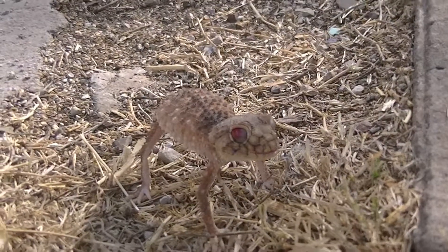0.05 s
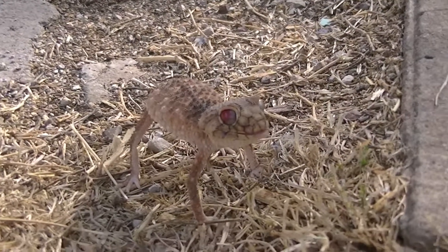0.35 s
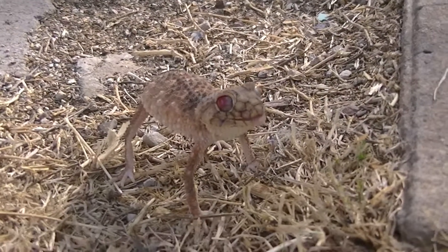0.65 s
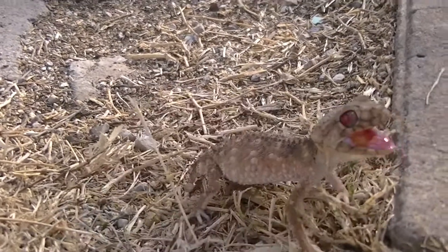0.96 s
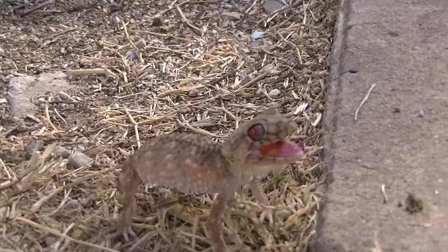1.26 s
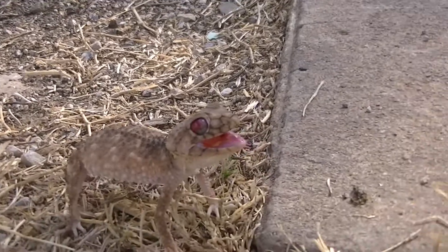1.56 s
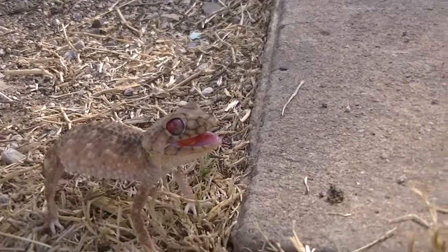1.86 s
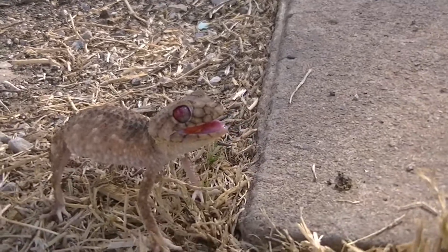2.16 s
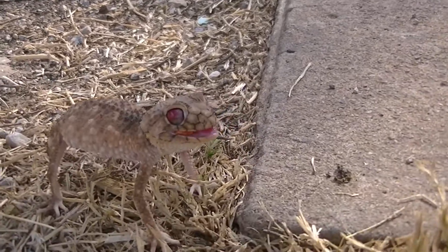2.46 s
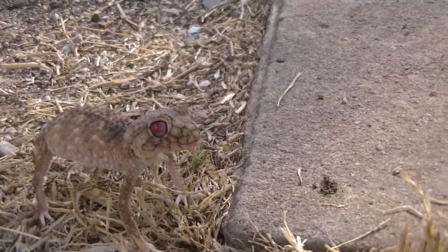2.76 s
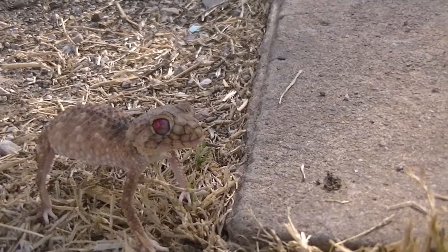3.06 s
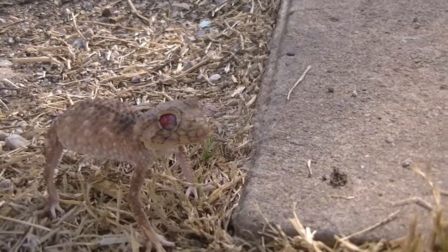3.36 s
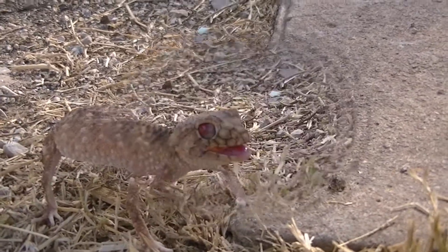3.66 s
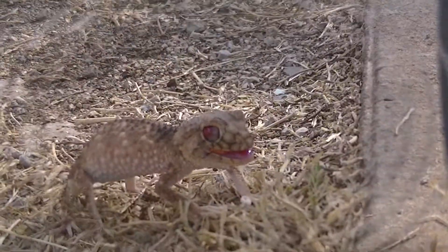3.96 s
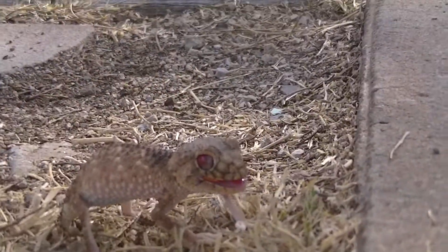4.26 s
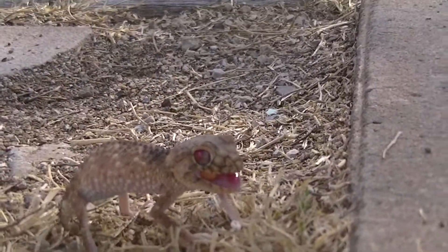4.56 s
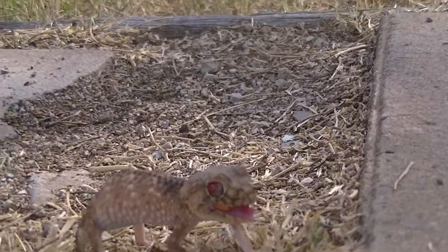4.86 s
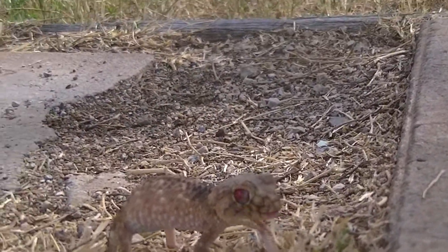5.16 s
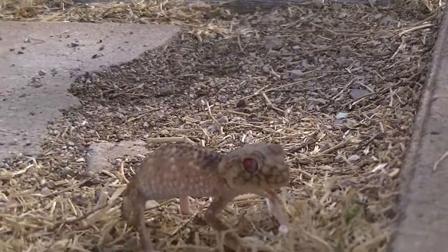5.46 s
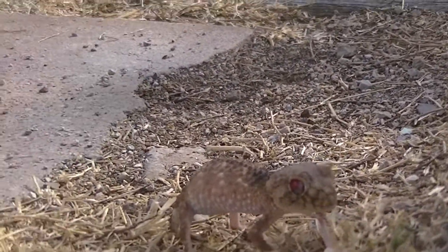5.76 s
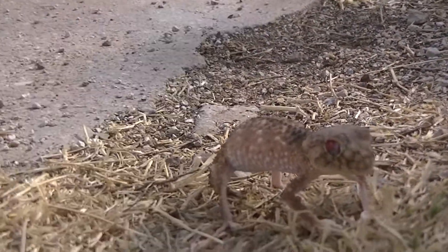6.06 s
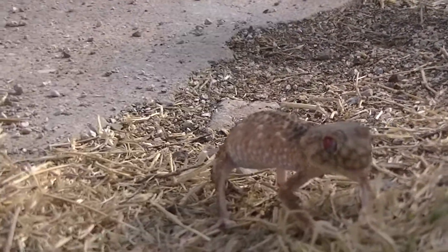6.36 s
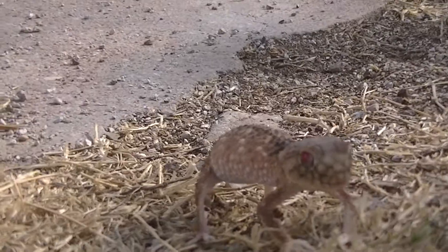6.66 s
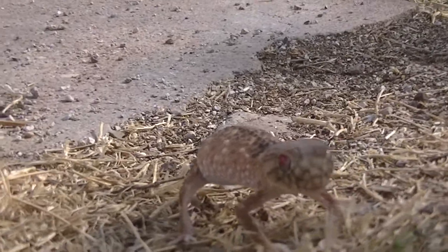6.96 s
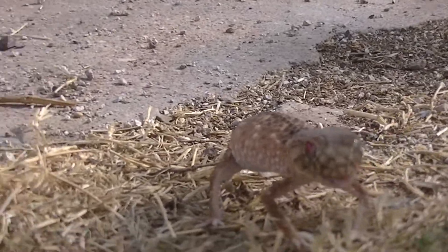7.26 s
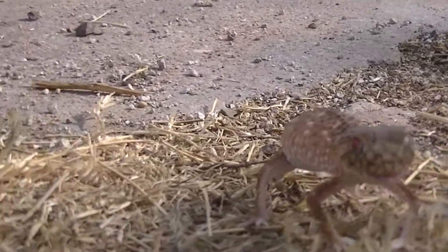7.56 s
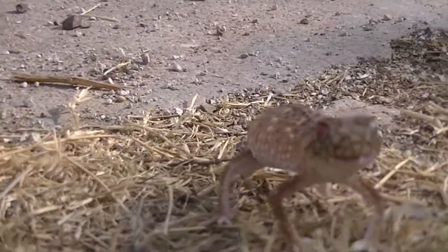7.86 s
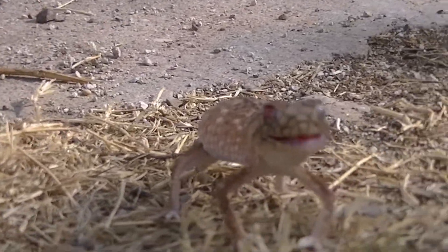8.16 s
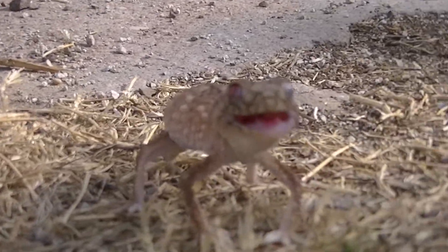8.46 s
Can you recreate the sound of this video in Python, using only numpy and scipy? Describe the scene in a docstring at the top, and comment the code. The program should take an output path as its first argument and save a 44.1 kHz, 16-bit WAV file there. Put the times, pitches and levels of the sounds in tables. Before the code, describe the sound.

Close, shrill lizard squeals, the first breaking into a bark, among straw crackles and a sharp snap, over distant birds and low rumble.

```python
"""A low outdoor rumble and faint bird whistles come first; then a gecko squeals near the microphone.
On dry straw and gravel it threatens three times, whistling through a tight glottis; the first squeal
breaks into a raspy bark of slack folds as it lunges. Close by, straw rustles and ticks, the ground
takes a few dull knocks and something hard snaps with one sharp click.
Small birds twitter farther off, echoing across the yard."""
import sys
import numpy as np
from scipy import signal
from scipy.fft import rfft, irfft
from scipy.io import wavfile
from scipy.ndimage import uniform_filter1d

SR = 44100
rng = np.random.default_rng(int(sys.argv[2]) if len(sys.argv) > 2 else 0)


def inscribe(sig):
    """Save sig as 16-bit PCM at rate SR to the path in sys.argv[1].

    A 1-D sig is mono; a 2-D sig holds one channel per row.
    Samples are clipped to [-1, 1] before scaling.
    """
    pcm = np.round(np.clip(np.atleast_2d(sig).T, -1, 1) * 32767)
    wavfile.write(sys.argv[1], SR, pcm.astype(np.int16))


N = 379260
TIME = np.arange(N) / SR
TOP_HZ = 15900

# The three squeals: (time [s], pitch [Hz], relative level [dB], roughness [0-1])
FIRST_SQUEAL = [(.653, 1150, -38.5, .7), (.69, 1614, -30.5, .35), (.728, 1545, -29.5, 0.27),
                (.75, 1754, -24.5, 0.22), (.778, 1755, -25.2, 0.29), (.8, 1970, -29, 0.43),
                (.85, 2100, -37, 1), (.9, 1698, -28, .15), (.945, 1640, -31, 0.05),
                (1.015, 1600, -32.5, .25), (1.06, 1320, -41.5, .3), (1.15, 965, -48, .3),
                (1.24, 790, -56, .4)]
SECOND_SQUEAL = [(4.16, 1303, -52, 0.94), (4.205, 972, -41, 0.87), (4.262, 1535, -39.5, .9),
                 (4.392, 1510, -40.5, 0.87), (4.48, 1029, -47, 0.89), (4.565, 998, -61, .9),
                 (4.635, 1240, -48.5, .9), (4.7, 1026, -54, 1)]
THIRD_SQUEAL = [(7.86, 1600, -44, 1), (7.896, 2217, -32, .7), (7.94, 2245, -35, 0.53),
                (8.08, 2215, -34.5, 0.8), (8.106, 2090, -33, 1), (8.128, 1745, -31.5, .55),
                (8.218, 1775, -34, .55), (8.248, 1516, -41.5, 0.78), (8.33, 1380, -48.5, 1)]
# The mouth's colour in each: (frequency [Hz], gain [dB])
WIDE_MOUTH = [(800, 0), (1750, -16), (2400, -2.5), (3400, -0.5), (4200, -4.5), (5200, -3), (6800, -18.5),
              (8700, -21.5), (12000, -30), (15000, -45)]
NARROW_MOUTH = [(900, 0.5), (1550, -6.5), (2100, 8), (3100, 1.5), (4600, -6), (6500, -13), (7400, -22),
                (8900, -13.5), (10000, -29), (15000, -41)]
PARTED_MOUTH = [(1200, -7), (1780, 1), (2250, -1), (3500, 8), (4500, -1), (5400, 2.5), (6800, -12),
                (9000, -6.5), (11000, -18.5), (15000, -42)]
def gecko():
    """The gecko, near the microphone: three thin squeals, a bark and a moan."""
    first, second, third, low = np.zeros((4, N))
    add(first, *squeal(FIRST_SQUEAL, WIDE_MOUTH, octave_db=4.5, flutter_hz=379.4, flutter=.11,
                       jitter=.068, shimmer_db=1.5, hiss_db=-15, tire=.55))
    add(second, *squeal(SECOND_SQUEAL, NARROW_MOUTH, octave_db=2.5, flutter_hz=220, flutter=.043,
                        jitter=.0428, shimmer_db=2, hiss_db=-16))
    add(third, *squeal(THIRD_SQUEAL, PARTED_MOUTH, octave_db=4, flutter_hz=285, flutter=.057,
                       jitter=.028, shimmer_db=2, hiss_db=-12))
    add(low, *bark())
    add(low, *moan())
    return gain(-1) * first + gain(2.5) * second + gain(-1) * third + low


def squeal(rows, mouth, octave_db, flutter_hz, flutter, jitter, shimmer_db, hiss_db, tire=0):
    """A tight glottis whistles harmonics; a slower flutter of the folds splits them into sidebands."""
    t, hz, level_db, rough = contours(rows)
    rough = np.clip(rough, 0, 1)
    beat = np.sin(2 * np.pi * cycles(flutter_hz * (1 + .1936 * wander(t, 58))))
    drift = .00267 * wander(t, 37) + rough ** 2 * jitter * wander(t, 375)
    turns = cycles(hz * (1 + drift + rough * flutter * beat))
    # as the breath gives out, the second partial takes over from the higher ones
    lift_db = octave_db + tire * np.maximum(-38 - level_db, 0)
    tone = 0
    for k in range(1, 12):
        partial_db = spectrum_at(mouth, k * hz) + lift_db * (k == 2) + min(k, 3) * wander(t, 49)
        # the fundamental stays pure while the overtones break up
        breakup = np.minimum(.35 * (k - 1) * rough, 1.2)
        scatter = breakup * (wander(t, 300) + 1j * wander(t, 300)) / np.sqrt(2)
        partial = ((1 + scatter) * np.exp(2j * np.pi * k * turns)).real
        tone += gain(partial_db) * (k * hz < TOP_HZ) * partial
    hiss = unit_rms(band(coloured(rng.standard_normal(len(t)), mouth), 400, 16000))
    voice = tone / np.sqrt(uniform_filter1d(tone ** 2, 512) + 1e-9) + gain(hiss_db) * rough * hiss
    # the folds are loudest at the slack part of each flutter, which favours the lower sidebands
    throb = 1 - .43 * rough * beat
    shimmer = gain(np.clip(shimmer_db * wander(t, 62), -5, 3))
    return t[0], unit_rms(voice * throb * shimmer) * gain(level_db) * signal.windows.tukey(len(t), .05)


# The bark: (time [s], pulse rate [Hz], level [dB], roughness [capped at 1])
BARK = [(.788, 152.7, -53, 1), (.795, 155.3, -26.5, 0.53), (.81, 212.5, -26.5, 0.5),
        (.83, 260.3, -24.5, 0.42), (.85, 249.5, -26.5, 0.24), (.872, 243.2, -25.5, 0.25),
        (.89, 205.5, -28.5, 0.57), (.91, 160.5, -31.5, 0.67), (.935, 141, -35.5, 0.8), (.97, 132, -44, 1.1)]
# The throat's colour: (frequency [Hz], gain [dB])
THROAT = [(200, -32), (330, 10), (500, 3), (720, -7.5), (980, -4.5), (1250, 4), (1800, -5.5), (2500, -6),
          (3400, 0), (4700, -3), (5900, -24), (8500, -15), (10200, -10), (15500, -18.5)]
def bark(jitter=.042, puff_turns=.38):
    """The folds slacken and slap: slow pulses growl, and a puff of air on each one rasps above them."""
    t, hz, level_db, rough = contours(BARK)
    rough = np.clip(rough, 0, 1)
    turns = cycles(hz * (1 + jitter * rough * wander(t, 170)))
    slaps = unit_rms(np.sinc((turns - np.round(turns)) * SR / hz) * gain(3.8 * rough * wander(t, 200)))
    growl = (1.2 - rough) * band(slaps, 100, 3350, order=3)
    puffs = unit_rms((.28 + np.exp(-(turns % 1) / puff_turns)) * rng.standard_normal(len(t)))
    rasp = 1.7 * rough * band(puffs, 750, 16000)
    breath = .79 * band(puffs, 2600, 16000, order=4)
    voice = coloured(growl + rasp + breath, THROAT)
    return t[0], voice / np.sqrt(uniform_filter1d(voice ** 2, 800)) * gain(level_db)


# A faint moan leading into the second squeal: (time [s], pitch [Hz], level [dB])
MOAN = [(4.04, 315, -49), (4.09, 361, -50.5), (4.14, 420, -47), (4.18, 390, -49), (4.215, 307, -58)]
def moan(overtone_db=-10):
    """A soft low arch of tone with one overtone."""
    t, hz, level_db = contours(MOAN)
    angle = 2 * np.pi * cycles(hz * (1 + .016 * wander(t, 60)))
    return t[0], gain(level_db) * unit_rms(np.sin(angle) + gain(overtone_db) * np.sin(2 * angle))


# The small hard thing's modes: (frequency [Hz], relative level [dB], t60 [s])
CLICK_MODES = [(824, -15, 0.03), (975, -15.5, 0.033), (1530, -13, .025), (1830, -7, 0.046),
               (1990, -9.5, 0.051), (2460, -5, 0.021), (2770, 0, 0.02), (3520, -6, 0.031),
               (4170, -8.5, 0.02), (4600, -14, 0.028), (5530, -3.5, 0.014), (6800, -15, .011),
               (9760, -7, 0.0065), (11450, -11, .009)]
def click(at_s=6.2303, peak_db=-6, crack_db=-9, crack_t60=.022):
    """Something small and hard snaps near the microphone and rings very briefly."""
    out, t = np.zeros(N), np.arange(4096) / SR
    ring = sum((-1) ** k * gain(db - 60 * t / t60) * np.sin(2 * np.pi * hz * t)
               for k, (hz, db, t60) in enumerate(CLICK_MODES))
    crack = band(rng.standard_normal(len(t)), 960, 5300, order=1) * gain(-60 * t / crack_t60)
    snap = band(unit_rms(ring) + gain(crack_db) * unit_rms(crack), 250, 11500)
    add(out, at_s, peaking(snap, peak_db))
    return out


# The loudest stalks: (time [s], peak [dB], ring [Hz], relative crack level [dB], t60 [s])
STALK_SNAPS = [(2.0438, -35, 2080, -9, .03), (2.066, -34.5, 2600, -17, .04),
               (2.7168, -30.5, 1830, -24, 0.053), (3.8264, -38, 1020, -11, .028),
               (3.8969, -30.5, 2150, -12, 0.015), (3.956, -30.5, 9820, -11, .024),
               (4.0048, -35, 4990, -10, .03), (4.1597, -26.5, 2310, -2, .041),
               (4.4253, -29, 2890, -19, .034), (4.6353, -26.5, 2430, -14.5, 0.067),
               (4.7162, -36, 2390, -9.5, 0.079), (4.935, -29.5, 2200, -19, 0.15),
               (5.1103, -37, 2120, -11, .043), (5.5608, -22, 2460, -7.5, 0.018),
               (5.6141, -34, 3100, -13, 0.024), (5.9757, -33, 1640, -17, .06), (5.9959, -24, 3450, -4, .04),
               (6.124, -32.5, 1550, -4.5, .035)]
def ticks(width=1.67, treble_db=2):
    """Stalks snap close by, each with a short ring around its own pitch and a quicker treble crack."""
    out, t = np.zeros(N), np.arange(4096) / SR
    for s, db, hz, crack_db, t60 in STALK_SNAPS + small_ticks():
        noise = rng.standard_normal(len(t))
        fall = gain(-60 * t / t60)
        ring = unit_rms(band(noise, hz / width, hz * width, order=4) * fall)
        crack = unit_rms(band(noise, 2300, 10500) * fall ** 2.2)
        add(out, s, peaking(ring + gain(crack_db + treble_db) * crack, db))
    return out


def small_ticks(per_s=11, ring_hz=2200, octaves=.42, crack_db=-15, t60=.033):
    """Rows for stalks that snap by chance, louder the harder the straw is stirred."""
    stir = stirring()
    at = np.flatnonzero((rng.random(N) < per_s / SR) & (stir > gain(-70)))
    peaks_db = 20 * np.log10(stir[at]) + 16
    return [(i / SR, db + 1.5 * size, ring_hz * 2 ** (octaves * pitch), crack_db, t60)
            for i, db, (size, pitch) in zip(at, peaks_db, rng.standard_normal((len(at), 2)))]


# Bouts of stirring in the straw: (time [s], length [s], relative treble level [dB])
STIRS = [(0.854, 0.034, -53), (1.005, .01, -59), (2.055, .012, -57.5), (2.135, .03, -66),
         (3.79, .415, -60.5), (4.223, 0.52, -68.5), (4.955, .018, -61.5), (6.879, .1, -66),
         (7.285, .1, -55.3), (7.495, 0.055, -64.5)]
def stirring(attack_s=.04, release_s=.033):
    """How hard the straw is stirred: each bout rises quickly, holds and dies away."""
    stir = np.zeros(N)
    for s, length, db in STIRS:
        rise = np.clip((TIME - s) / attack_s + 1, 0, 1)
        fall = np.exp(-np.maximum(TIME - s - length, 0) / release_s)
        stir += gain(db) * rise * fall
    return stir


# Dry straw's colour: (frequency [Hz], gain [dB])
STRAW = [(410, -13.5), (700, 4.5), (1150, -3.5), (1950, -3.5), (2310, 3.5), (2660, -1), (4950, -2.5),
         (5640, -5), (10900, -2), (15500, -14)]
def rustle(slips_per_s=1300, spread_db=4, scrape=.66):
    """Dry stalks near the microphone slide and crackle in a swarm of tiny slips."""
    sizes = gain(spread_db * np.minimum(rng.exponential(1, N), 4)) * rng.choice([-1, 1], N)
    slips = unit_rms(sizes * (rng.random(N) < slips_per_s / SR)) + scrape * rng.standard_normal(N)
    straw = coloured(slips * gain(1.9 * wander(TIME, 52)), STRAW)
    straw /= np.std(band(straw, 10500, 15500, order=4))
    return gain(3.5) * stirring() * straw


# Single knocks: (time [s], peak [dB], brightness [Hz])
KNOCKS = [(4.632, -35, 1390), (5.111, -37, 269), (5.506, -33.5, 1270), (5.686, -36, 331),
          (5.996, -35, 1260), (6.125, -35, 466), (7.667, -29, 260), (8.398, -37, 202), (8.519, -42, 393),
          (8.547, -39.5, 578)]
# Quick runs of knocks: (time [s], length [s], mid-run peak [dB], brightness [Hz])
SCUFFLES = [(7.334, 0.041, -24, 347), (8.047, .068, -24.5, 540)]
def knocks(knock_t60=.044, scuffle_t60=.06, step_s=.0145, edge_db=-4.5):
    """Dull blows on the ground close by, singly or in scuffles that swell and ebb."""
    out = np.zeros(N)
    for s, db, bright_hz in KNOCKS:
        add(out, s, peaking(blow(bright_hz, knock_t60), db))
    for s, length, db, bright_hz in SCUFFLES:
        for after in np.arange(0, length, step_s):
            ebb_db = edge_db * abs(2 * after / length - 1)
            add(out, s + after, peaking(blow(bright_hz, scuffle_t60), db + ebb_db))
    return out


# The ground's modes: (frequency [Hz], relative level [dB], ring time [factor])
GROUND_MODES = [(206, -10.5, 1), (390, -7, 0.66), (531, -2, 0.86), (752, -4.5, 0.29), (1014, -5, 0.92),
                (1270, 1.5, 1), (1650, -22, 0.89)]
def blow(bright_hz, t60, detune=.064, grit=.46):
    """A soft blow on littered ground: a few damped low modes and some grit."""
    t = np.arange(6000) / SR
    fall_db = -60 * t / t60
    ring = 0
    for hz, db, hold in GROUND_MODES:
        wave = rng.choice([-1, 1]) * np.sin(2 * np.pi * hz * (1 + detune * rng.standard_normal()) * t)
        ring += wave * gain(db + fall_db / hold) / (1 + (hz / (1.33 * bright_hz)) ** 3)
    litter = band(rng.standard_normal(len(t)), 246, 1270) * gain(fall_db)
    return band(unit_rms(ring) + grit * unit_rms(litter), 230, 5000)


# Twitters: (time [s], arch gap [s], lead-in [Hz], first top [Hz], second top [Hz], relative level [dB])
TWITTERS = [(1.86, .052, 4450, 4300, 4400, -45.5), (2.764, .047, 5460, 4290, 4320, -43.5),
            (4.342, .047, 4950, 4550, 4500, -40), (5.192, .07, 5100, 4500, 3850, -36.5),
            (6.026, .034, 3340, 3680, 3760, -40.5), (7.55, .039, 4980, 4200, 4250, -41.5),
            (8.33, .037, 3900, 4150, 3510, -45)]
# Slurred whistles: (time [s], length [s], start [Hz], end [Hz], relative level [dB])
SLURS = [(.231, .075, 5120, 4900, -52), (.277, .054, 4000, 3300, -55), (.37, 0.033, 4620, 4600, -52.5),
         (1.24, 0.071, 4710, 4450, -49), (1.429, 0.042, 4700, 6300, -51.5), (1.483, .056, 4600, 3000, -54),
         (2.152, .11, 5100, 4820, -51.5), (2.919, .08, 5150, 4860, -57), (3.729, 0.03, 4200, 6300, -52),
         (4.945, .075, 5310, 3390, -50.5), (5.03, .05, 3600, 5000, -52), (5.218, 0.021, 3650, 3900, -40.5),
         (5.728, .11, 5180, 2930, -54.5), (5.952, 0.044, 4100, 4900, -46),
         (6.674, 0.099, 5380, 3400, -48.5), (6.787, .053, 3440, 3350, -48), (6.85, 0.1, 5130, 4850, -54.5),
         (7.765, .06, 5240, 3320, -51.5)]
def birds():
    """Loud syllables come straight across the yard; faint ones reach the microphone mostly as echo."""
    direct, scattered = np.zeros((2, N))
    song = [note for row in TWITTERS for note in twitter(*row)]
    song += [(s, length, start, (start + end) / 2, end, db) for s, length, start, end, db in SLURS]
    for s, *shape, db in song:
        direct_share = np.interp(db, [-56, -40], [.25, .7])
        add(direct, s, gain(db) * np.sqrt(direct_share) * syllable(*shape))
        add(scattered, s, gain(db) * np.sqrt(1 - direct_share) * syllable(*shape, waver=.11))
    return gain(-1) * (direct + chipping_bird() + 1.05 * yard(scattered, t60=.38))


def twitter(s, gap_s, lead_hz, first_hz, second_hz, db, foot=.68, tail_hz=3050):
    """Syllable rows for a rising lead-in, two quick arches and a falling tail."""
    lead_s, first_s, second_s, tail_s = .046, .034, .019, .04
    return [(s - lead_s, lead_s, lead_hz / 1.09, lead_hz, lead_hz * 1.09, db - 8.5),
            (s, first_s, first_hz * foot, first_hz, first_hz * foot, db),
            (s + gap_s, second_s, second_hz * foot, second_hz, second_hz * foot, db - 2),
            (s + gap_s + second_s / 2, tail_s, tail_hz / .87, tail_hz, tail_hz * .87, db - 8)]


def syllable(length, first_hz, middle_hz, last_hz, waver=.018):
    """A bird's whistle bends through three pitches."""
    t = np.arange(0, length, 1 / SR)
    position = 2 * t / length - 1
    hz = middle_hz + (np.where(position < 0, first_hz, last_hz) - middle_hz) * abs(position) ** 1.378
    angle = 2 * np.pi * cycles(hz * (1 + waver * wander(t, 366)))
    return unit_rms(np.sin(angle) * signal.windows.tukey(len(t), .5))


def chipping_bird(start_s=2.322, end_s=3.52, period_s=.13, hz=3880, fade_db_per_s=5):
    """A second, softer bird chips at an even pace, fading as it goes."""
    out = np.zeros(N)
    for s in np.arange(start_s, end_s, period_s):
        add(out, s, gain(-57 - fade_db_per_s * (s - start_s)) * syllable(.02, .9 * hz, hz, .9 * hz))
    return out


def chatter(per_s=6, length_s=.045, centre_hz=3900, spread_octaves=.25, bend_octaves=.2):
    """Faint syllables of random pitch and bend from the farthest birds."""
    out = np.zeros(N)
    at = np.flatnonzero(rng.random(N) < per_s / SR)
    for i, (pitch, start, end, size) in zip(at, rng.standard_normal((len(at), 4))):
        pitches = centre_hz * 2 ** (spread_octaves * pitch + bend_octaves * np.array([start, 0, end]))
        add(out, i / SR, gain(-66.5 + 2 * size) * syllable(length_s, *pitches))
    return out + yard(out, t60=.38)


# The open air's colour: (frequency [Hz], gain [dB])
AIR = [(15, -57), (25, -53), (59, -8.5), (130, -1.5), (184, -3.5), (241, -1.5), (557, -17.5), (905, -20),
       (1390, -22), (1780, -23.5), (2590, -23), (3880, -27), (4210, -29), (4820, -27.5), (15800, -38)]
# The far rumble and the far hum: (time [s], level [dB])
RUMBLE = [(0.0, -54.5), (0.5, -52.5), (1.72, -51), (3.47, -47.5), (4.43, -53), (7.26, -56), (7.42, -53),
          (8.6, -55.5)]
HUM = [(0, -68), (4.2, -58), (5, -65.5), (7, -58.5), (8.6, -57.5)]
def outdoors(split_hz=480, hiss_db=-55.5, hum_hz=193.7):
    """A lumpy far rumble and a wavering hum, under air hiss that swells a little with the rumble."""
    noise = coloured(rng.standard_normal(N), AIR)
    rumble = signal.sosfilt(signal.butter(3, split_hz, fs=SR, output="sos"), noise)
    hiss = signal.sosfilt(signal.butter(3, split_hz, "high", fs=SR, output="sos"), noise)
    rumble /= np.std(band(noise, 80, 400, order=4))
    hiss /= np.std(band(noise, 700, 15000, order=4))
    hum = unit_rms(np.sin(2 * np.pi * cycles(hum_hz * (1 + .018 * wander(TIME, 14.7)))))
    rumble_db = np.interp(TIME, *np.transpose(RUMBLE)) - .04
    return (rumble * gain(rumble_db + .6 * wander(TIME, 10))
            + hiss * gain(hiss_db + .07 * (rumble_db - rumble_db.mean()))
            + hum * gain(np.interp(TIME, *np.transpose(HUM)) + 1.2 * wander(TIME, 12)))


def yard(x, t60, echoes_per_s=2000):
    """Sparse echoes from ground, walls and bushes, dull in the treble."""
    t = np.arange(SR) / SR
    taps = rng.choice([-1, 1], SR) * (rng.random(SR) < echoes_per_s / SR) * (t > .006)
    tail = band(taps * gain(-60 * t / t60), 320, 3800, order=1)
    return signal.oaconvolve(x, tail / np.linalg.norm(tail))[:N] / 2


def gain(db):
    """Decibels to a factor."""
    return 10 ** (np.asarray(db) / 20)


def unit_rms(x):
    """Scales to an rms of one."""
    return x / np.sqrt(np.mean(x ** 2) + 1e-20)


def peaking(x, db):
    """Scales to a peak of db."""
    return gain(db) * x / abs(x).max()


def cycles(hz):
    """The running phase of a pitch, in turns."""
    return np.cumsum(hz) / SR


def spectrum_at(points, hz):
    """A spectrum's value at hz, on a log-frequency axis."""
    points_hz, db = np.transpose(points)
    return np.interp(np.log(hz + 1), np.log(points_hz + 1), db)


def contours(rows):
    """The times a table spans, and its columns at every sample."""
    s, *columns = np.transpose(rows)
    t = np.arange(s[0], s[-1], 1 / SR)
    return [t] + [np.interp(t, s, column) for column in columns]


def add(mix, s, sound):
    """Mixes a sound in at s seconds."""
    part = mix[max(round(s * SR), 0):][:len(sound)]
    part += sound[:len(part)]


def coloured(x, points):
    """Filters x by a spectrum, causally, so that every pulse rings forwards."""
    log_gain = spectrum_at(points, abs(np.fft.fftfreq(2048, 1 / SR))) * np.log(10) / 20
    taps = np.fft.ifft(np.exp(np.conj(signal.hilbert(log_gain)))).real
    return signal.oaconvolve(x, taps)[:len(x)]


def band(x, low_hz, high_hz, order=2):
    """Band-pass filter."""
    return signal.sosfilt(signal.butter(order, [low_hz, high_hz], "band", fs=SR, output="sos"), x)


def wander(t, rate_hz):
    """Smooth random motion of rms one, up to about rate_hz."""
    hz = np.fft.rfftfreq(len(t), 1 / SR)
    noise = rng.standard_normal(N if len(t) > SR else SR)[:len(t)]
    return unit_rms(irfft(rfft(noise) / (1 + (hz / rate_hz) ** 4), len(t)))


def scene(wall_delay_s=.14, wall_db=-19):
    """One microphone in a yard: near sounds are almost dry, but a far wall returns the gecko's voice."""
    voice, snap = gecko(), click()
    near = voice + ticks() + knocks() + rustle()
    echo = gain(-15) * yard(near, t60=.3)
    add(echo, wall_delay_s, gain(wall_db) * band(voice, 1800, 6000))
    snap_echo = gain(-24.5) * yard(band(snap, 700, 4000), t60=.98)
    return (near + snap + birds() + echo + snap_echo + outdoors() + chatter())[None]


def record(dry):
    """The recorder cuts the treble above TOP_HZ."""
    lowpass = signal.firwin(511, TOP_HZ, window=("kaiser", 9), fs=SR)
    return signal.oaconvolve(dry, lowpass[None], "same")


dry = scene()
out = record(dry)
inscribe(out)
```